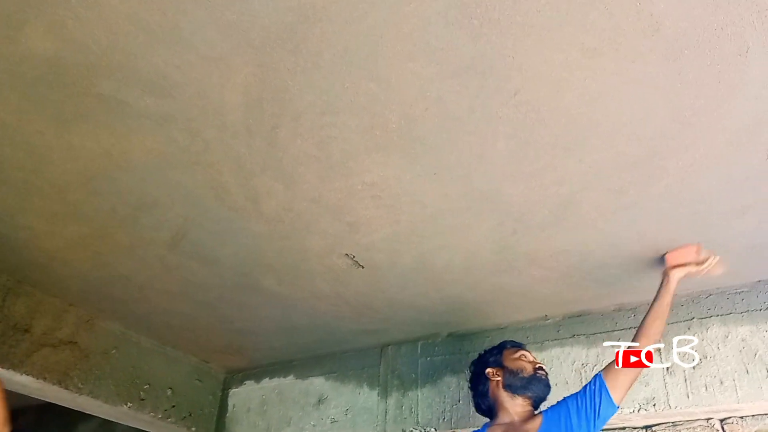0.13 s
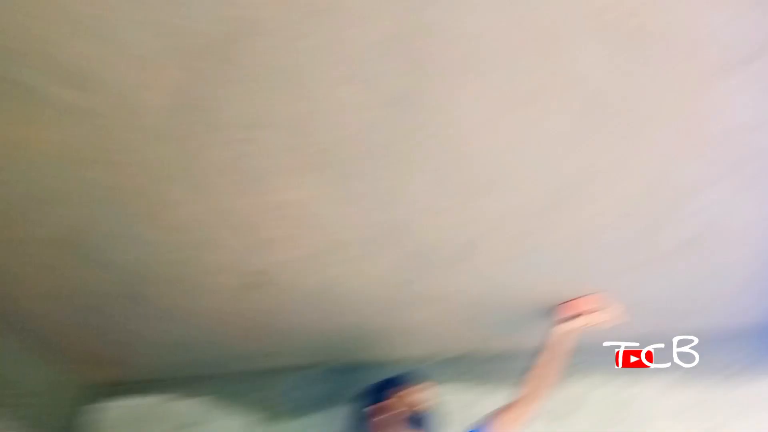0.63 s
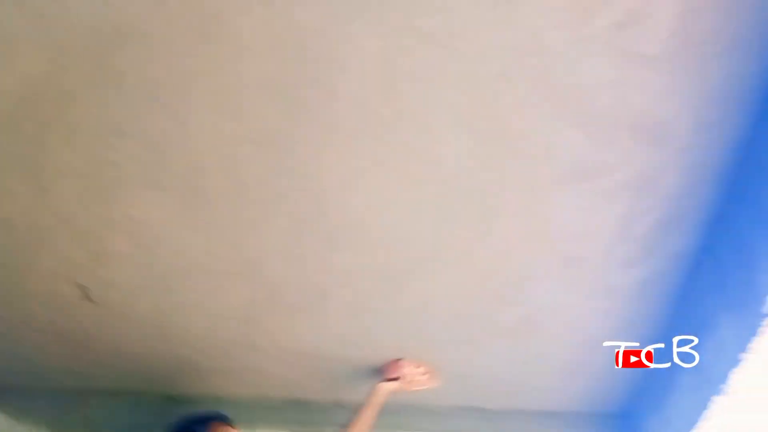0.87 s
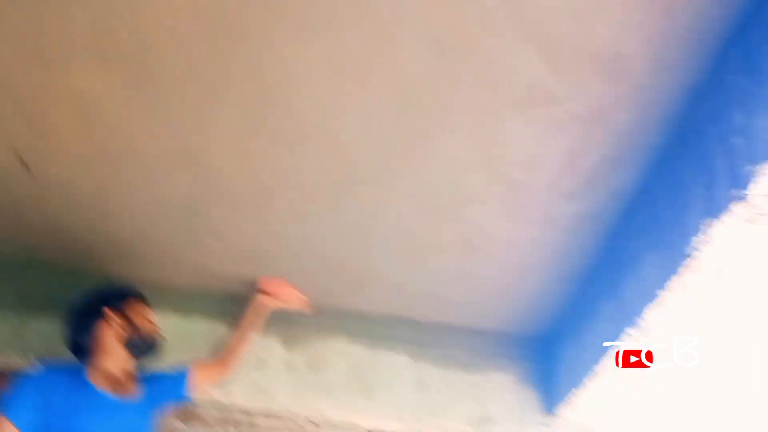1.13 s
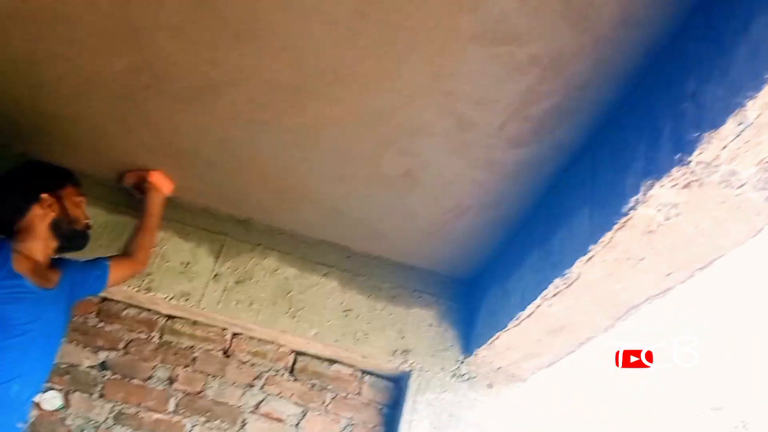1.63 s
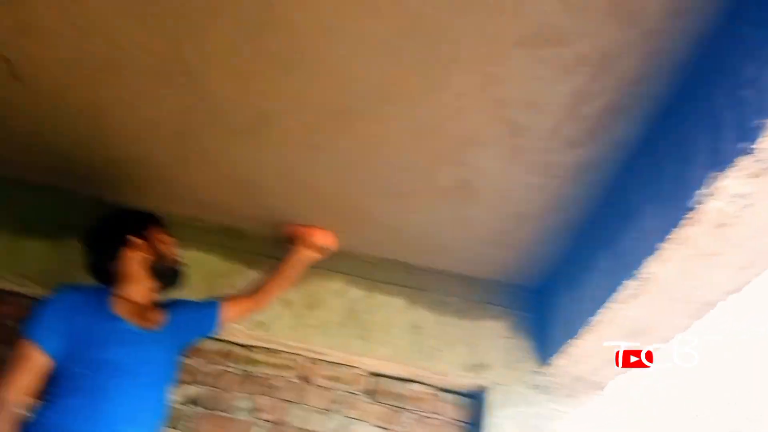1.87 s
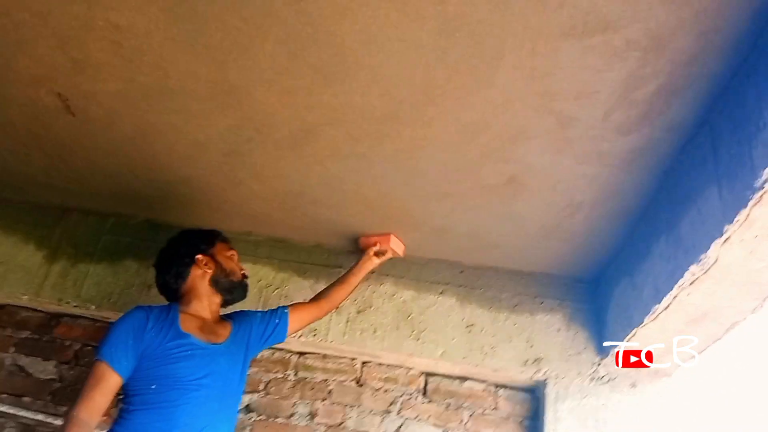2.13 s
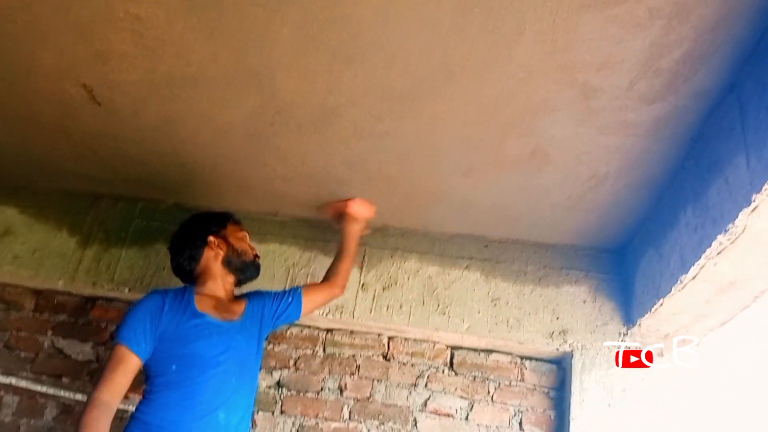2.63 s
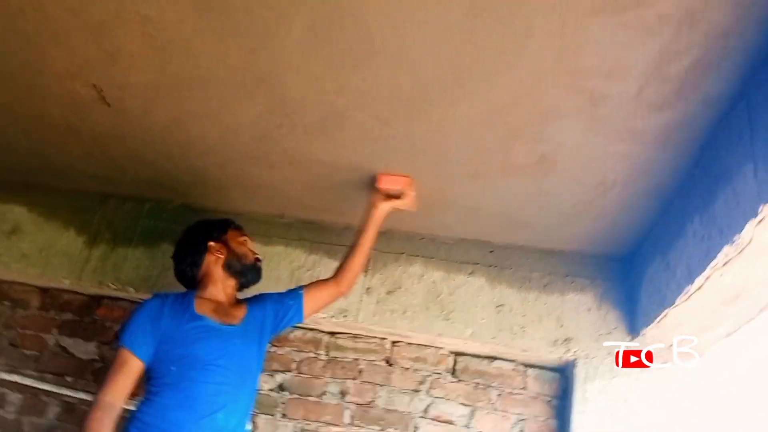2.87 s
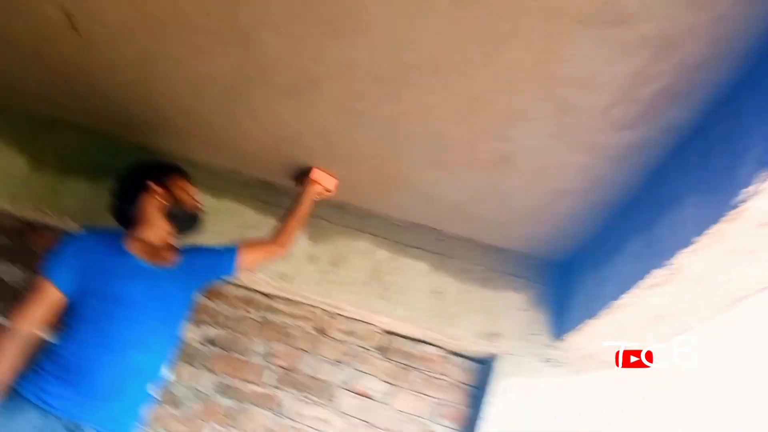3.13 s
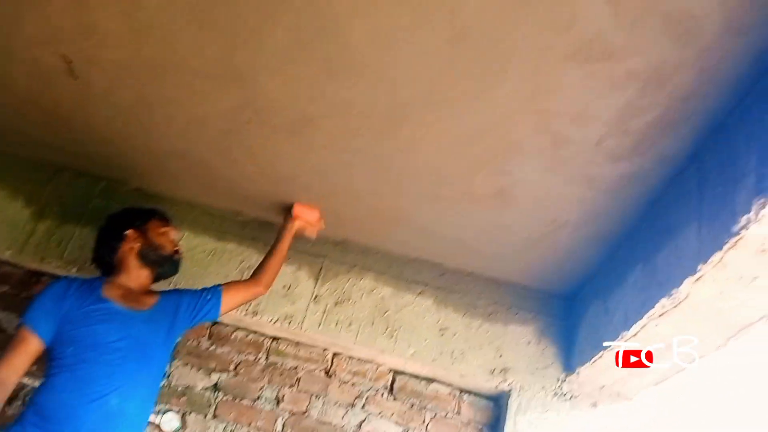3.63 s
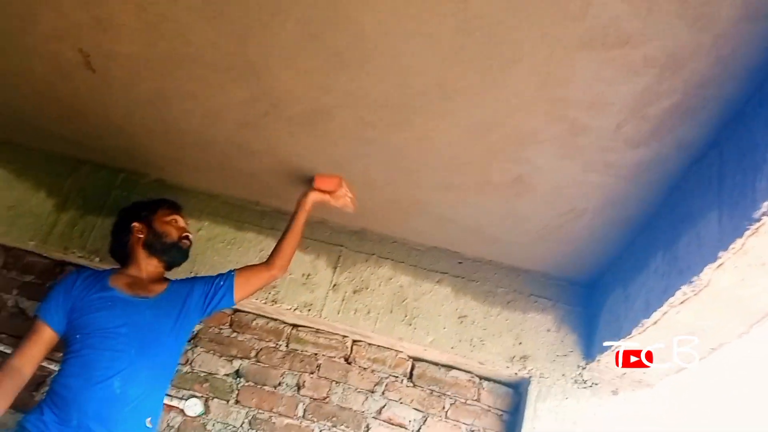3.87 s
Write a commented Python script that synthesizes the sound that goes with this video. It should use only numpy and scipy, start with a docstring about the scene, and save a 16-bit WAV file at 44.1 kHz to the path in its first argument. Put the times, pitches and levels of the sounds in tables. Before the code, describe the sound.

A hand-held block scrapes sandy ceiling plaster in short gritty strokes, with dull knocks at some turns; a board thuds and rattles after a second. Bare echoing room, faint outdoor wash, small mono microphone.

```python
"""A hand-held block is rubbed in strokes over wet plaster on the ceiling of a bare, echoing shell of a room.
From the start crushed sand grains crackle and excite rings of the block, over faint wash and breeze.
Dull knocks, as dying bands of noise, mark some turns; after a second a board underfoot thuds once and
rattles through its modes; late on, soft bumps, short windowed sines, reach the small mono microphone."""
import sys
import numpy as np
from scipy import signal
from scipy.fft import rfft, irfft
from scipy.io import wavfile
from scipy.ndimage import uniform_filter1d

SR = 44100
rng = np.random.default_rng(int(sys.argv[2]) if len(sys.argv) > 2 else 0)


def linear_from_db(decibels):
    """Turn decibels (scalar or array-like) into linear amplitude factors; 0 gives 1."""
    return 10 ** (np.asarray(decibels, float) / 20)


def inscribe(sig):
    """Save sig as 16-bit PCM at rate SR to the path in sys.argv[1].

    A 1-D sig is mono; a 2-D sig holds one channel per row.
    Samples are clipped to [-1, 1] before scaling.
    """
    pcm = np.round(np.clip(np.atleast_2d(sig).T, -1, 1) * 32767)
    wavfile.write(sys.argv[1], SR, pcm.astype(np.int16))


N = 176400

# Spectrum of crushed grit. Each row: frequency in Hz, relative density in dB per Hz.
GRIT_SPECTRUM = [(700, -29), (1250, -2), (2300, 1.5), (3000, 2), (6500, -2.5), (7800, -17), (9400, -16.5),
                 (11300, -30.5), (13800, -29), (14600, -28), (15500, -4.5)]


def evened(x):
    """Scales to rms 1."""
    return x / np.sqrt(np.mean(x ** 2) + 1e-20)


def smoothed(x, size):
    """Two moving averages of size samples, scaled to rms 1: a slow random drift when fed noise."""
    return evened(uniform_filter1d(uniform_filter1d(x, size=size), size=size))


def add(mix, start_s, sound):
    """Mixes a sound in at start_s, cut at the end of the mix."""
    part = mix[round(start_s * SR):][:len(sound)]
    part += sound[:len(part)]


def colour(x, points):
    """Filters by a spectrum of (Hz, dB) points, interpolated over log frequency."""
    f, db = np.transpose(points)
    hz = np.fft.rfftfreq(len(x), 1 / SR)
    gain_db = np.interp(np.log(hz + 1), np.log(f + 1), db)
    return irfft(rfft(x) * linear_from_db(gain_db), len(x))


def resonate(x, hz, width_hz):
    """One-pole resonance that follows hz: shift down to 0 Hz, smooth, shift back up."""
    carrier = np.exp(2j * np.pi * np.cumsum(hz * np.ones(len(x))) / SR)
    pole = np.exp(-np.pi * width_hz / SR)
    return 2 * (carrier * signal.lfilter([1 - pole], [1, -pole], x / carrier)).real


def grains():
    """Sand grains crushed at random moments: impulses of random sign and size, level drifting slightly."""
    grains_per_s, size_spread_db, chatter_db = 9000, 1, 0.5
    hit = rng.random(N) < grains_per_s / SR
    size = np.minimum(rng.exponential(1, N), 5)
    sign = np.sign(rng.standard_normal(N))
    chatter = smoothed(rng.standard_normal(N), 400)
    return hit * sign * linear_from_db(size_spread_db * size + chatter_db * chatter)


def strokes(sand):
    """Grains rubbed between block and plaster: grit and low scrub, heard only while they touch."""
    # One list per stroke. Each row: time in seconds, grit level in dB before the band shares.
    stroke_rows = [
        [(0, -57.5), (.09, -63.5)],
        [(.113, -36), (.232, -38.5), (.25, -52)],
        [(.338, -38), (.39, -43.5), (.47, -41.5)],
        [(.485, -37), (.58, -27), (.65, -32), (.75, -38.5), (.83, -53.5)],
        [(1.34, -55.5), (1.44, -45), (1.5, -40), (1.62, -35.5), (1.81, -35.5), (1.86, -53.5)],
        [(2.158, -28), (2.215, -35), (2.245, -27), (2.31, -40), (2.36, -45.5)],
        [(2.512, -33), (2.585, -28), (2.68, -32), (2.72, -38), (2.87, -44.5)],
        [(2.87, -50), (3.0, -39), (3.05, -37), (3.15, -37.5), (3.26, -51.5)],
        [(3.55, -61.5), (3.61, -51.5), (3.67, -61.5), (3.72, -47)],
        [(3.728, -39.5), (3.77, -46), (3.88, -39.5), (4.0, -47.5)],
    ]
    # Gain per stroke in dB: treble of the grit, grit below mid_hz, low scrub.
    treble_shares = [-28, -2.5, -11, 0, 2, -2.5, -1.5, 4.5, 7, 1]
    mid_shares = [11.5, -1, 5.5, -0.5, -4, -8, -4.5, -1, 2, -4.5]
    scrub_shares = [-3.5, -6, -1, -13.5, -16, -9, -10.5, -14.5, -9, -10]
    # Spectrum of the scrub. Each row: frequency in Hz, relative density in dB per Hz.
    scrub_spectrum = [(80, -81), (170, -14), (520, -2.5), (1100, -6.5), (1600, -23)]
    treble_hz, mid_hz = 7070, 2330
    touch_s, lift_s, scrub_rise_s = 0.0051, 0.069, 0.023
    touch_hiss_db, touch_hiss_s = 9.5, 0.038  # extra treble as the block lands, time constant

    grit = evened(colour(sand, GRIT_SPECTRUM))
    treble = signal.sosfiltfilt(signal.butter(4, treble_hz, "high", fs=SR, output="sos"), grit)
    body = grit - treble
    treble = evened(treble)
    mid = signal.sosfiltfilt(signal.butter(4, mid_hz, fs=SR, output="sos"), body)
    scrub = evened(colour(sand, scrub_spectrum))

    out = np.zeros(N)
    for rows, treble_db, mid_db, scrub_db in zip(stroke_rows, treble_shares, mid_shares, scrub_shares):
        s, level_db = np.transpose(rows)
        end_s = s[-1] + lift_s
        at = slice(round(s[0] * SR), min(round(end_s * SR), N))
        t = np.arange(at.start, at.stop) / SR
        since = t - t[0]
        touch = np.clip(since / touch_s, 0, 1) * np.clip((end_s - t) / lift_s, 0, 1)
        hiss = linear_from_db(treble_db + touch_hiss_db * np.exp(-since / touch_hiss_s)) * treble[at]
        low = linear_from_db(scrub_db) * (1 - np.exp(-since / scrub_rise_s)) * scrub[at]
        rub = body[at] + (linear_from_db(mid_db) - 1) * mid[at] + hiss + low
        out[at] += touch * linear_from_db(np.interp(t, s, level_db)) * rub
    return out


def block_rings(sand):
    """The rubbed block sings in passing bands: grains through two resonances of wandering pitch."""
    # Each row: start in seconds (negative: already sounding), length in seconds, centre in Hz,
    # width in Hz, rms level in dB before the swell.
    rings = [(-.2, 0.23, 1440, 255, -45.5), (0.4, 0.075, 208, 50, -48.5), (0.138, 0.112, 3140, 695, -39),
             (0.331, 0.075, 3000, 600, -41), (0.488, 0.041, 2720, 280, -34),
             (0.52, 0.071, 1260, 441, -37.5), (0.552, 0.15, 1873, 278, -31.5),
             (0.677, 0.11, 1520, 720, -36), (1.422, 0.55, 1510, 298, -47), (1.444, 0.46, 2430, 250, -50),
             (2.165, 0.1, 3880, 496, -42), (2.202, .11, 2910, 600, -34.5), (2.552, 0.17, 3020, 620, -31),
             (2.569, 0.08, 1840, 373, -35.5), (2.551, 0.045, 1130, 120, -44),
             (3.083, 0.2, 1564, 217, -49.5), (3.79, 0.24, 1680, 300, -47), (3.844, 0.16, 5280, 259, -49)]
    wander_hz, chatter_db = 39, 0.5
    wander, flutter = (smoothed(v, 500) for v in rng.standard_normal((2, N)))
    out = np.zeros(N)
    for s, length_s, centre_hz, width_hz, db in rings:
        start_s = max(s, 0)
        at = slice(round(start_s * SR), round((s + length_s) * SR))
        hz = centre_hz + np.minimum(wander_hz, width_hz / 2) * wander[at]
        ring = evened(resonate(resonate(sand[at], hz, width_hz), hz, 3 * width_hz))
        phase = np.linspace(max(-s / length_s, 0), 1, len(ring))
        swell = abs(np.sin(np.pi * phase ** 0.57)) ** 0.66
        add(out, start_s, linear_from_db(db + chatter_db * flutter[at]) * swell * ring)
    return out


def room(x):
    """Bare-room reverberation: decaying noise, early burst plus long tail; three such responses take turns."""
    # Each row: frequency in Hz, t60 of the long tail in seconds.
    tail_decay = [(200, 1), (1500, 1.0), (5000, 0.87), (12000, 0.72)]
    late_db, early_db, early_t60_s = -5.5, -12.5, 0.033
    turns_per_s, delay_samples = 3, 150
    turn = 2 * np.pi * turns_per_s * np.arange(N) / SR
    out = np.zeros(N)
    f, t60_s = np.transpose(tail_decay)
    for k in range(3):
        hz, t, z = signal.stft(rng.standard_normal(SR * 3 // 2), SR, nperseg=256)
        late = linear_from_db(-60 * t / np.interp(np.log(hz + 1), np.log(f), t60_s)[:, None])
        early = linear_from_db(-60 * t / early_t60_s) * np.ones_like(late)
        response = 0
        for shape, db in ((late, late_db), (early, early_db)):
            part = signal.istft(z * shape, SR, nperseg=256)[1][128:]
            response = response + linear_from_db(db) * part / np.linalg.norm(part)
        fed = x * np.sqrt(2 / 3) * np.cos(turn + k * np.pi / 3)
        out += signal.fftconvolve(fed, np.r_[np.zeros(delay_samples), response])[:N]
    return out


def air():
    """Faint steady outdoor wash (coloured noise) and a lumpy breeze (resonant low noise) at the microphone."""
    # Each row: frequency in Hz, relative density in dB per Hz.
    wash_spectrum = [(100, -38), (250, -13.5), (1400, -14), (6500, -19), (12000, -27.5), (15000, -31)]
    wash_db, wind_hz, wind_db, gust_db = -62, 77.3, -69, 7
    wash, wind, gust = rng.standard_normal((3, N))
    gust = smoothed(gust, 3000)
    wind = evened(resonate(resonate(wind, wind_hz, 90), wind_hz, 140))
    return linear_from_db(wash_db) * evened(colour(wash, wash_spectrum)) + linear_from_db(wind_db + gust_db * gust) * wind


def knocks():
    """Dull knocks of the block: decaying noise through two resonances."""
    # Each row: start in seconds, rms level of the first 20 ms in dB before the attack ramp,
    # centre in Hz, width in Hz, t60 of the exciting noise in seconds.
    knock_rows = [(.117, -44.5, 600, 118, 0.33), (0.339, -35.5, 912, 100, 0.13),
                  (1.797, -39, 577, 583, 0.33), (2.881, -45, 662, 158, 0.18),
                  (3.730, -37, 2310, 980, 0.052), (3.731, -37, 710, 900, 0.2),
                  (3.86, -40.5, 350, 260, 0.23)]
    attack_s = 0.0024
    t = np.arange(SR // 3) / SR
    out = np.zeros(N)
    for s, db, hz, width_hz, t60_s in knock_rows:
        blow = rng.standard_normal(len(t)) * linear_from_db(-60 * t / t60_s)
        ring = resonate(resonate(blow, hz, width_hz), hz, 2 * width_hz)
        ring = ring / np.sqrt(np.mean(ring[:SR // 50] ** 2))
        add(out, s, linear_from_db(db) * np.minimum(t / attack_s, 1) * ring)
    return out


def board():
    """A board thuds with a gritty crack, then rattles: noise through its modes, the higher fading faster."""
    # Each row: time in seconds, rattle level in dB.
    blows = [(1.185, -23.5), (1.219, -42), (1.262, -32.5), (1.3, -51), (1.347, -38.5), (1.4, -56),
             (1.48, -42.5), (1.529, -79)]
    # Each row: mode in Hz, width in Hz, relative level in dB.
    modes = [(221, 90, -3.5), (292.6, 150, 2.5), (425, 83, -3), (556, 430, -5), (815, 310, -12)]
    attack_s, crack_db, crack_t60_s = 0.00052, -42, 0.64
    dulling_db_per_s = 10  # per octave above 200 Hz
    s, db = np.transpose(blows)
    t = np.arange(0, s[-1] - s[0], 1 / SR)
    shake, grit = rng.standard_normal((2, SR))[:, :len(t)]
    rattle = np.zeros(len(t))
    for hz, width_hz, mode_db in modes:
        mode = evened(resonate(resonate(shake, hz, width_hz), hz, width_hz))
        rattle += linear_from_db(mode_db - dulling_db_per_s * t * np.log2(hz / 200)) * mode
    rattle = evened(rattle)
    rattle = rattle / np.sqrt(uniform_filter1d(rattle ** 2, size=900))  # the blows set the level
    crack = linear_from_db(crack_db - 60 * t / crack_t60_s) * evened(colour(grit, GRIT_SPECTRUM))
    thud = linear_from_db(np.interp(t + s[0], s, db)) * rattle + crack
    out = np.zeros(N)
    add(out, s[0], np.minimum(t / attack_s, 1) * thud)
    return out


def bumps():
    """Soft low bumps close to the microphone: two sine cycles under a half-sine window."""
    # Each row: time in seconds (half a cycle after onset), sine amplitude in dB before the window,
    # frequency in Hz.
    bump_rows = [(3.315, -43.5, 84), (3.625, -47.5, 116), (3.659, -47, 114), (3.702, -40, 102)]
    cycles = 2
    out = np.zeros(N)
    for s, db, hz in bump_rows:
        u = np.arange(0, 1, hz / cycles / SR)
        add(out, s - 0.5 / hz, linear_from_db(db) * np.sin(np.pi * u) * np.sin(2 * np.pi * cycles * u))
    return out


def scene():
    """Block and board sound in the room, bumps and air at the microphone; mono on both channels."""
    sand = grains()
    dry = strokes(sand) + block_rings(sand) + knocks() + board()
    mono = dry + room(dry) + bumps() + air()
    return np.array([mono, mono])


def roll_off(x):
    """The treble ends steeply here."""
    return signal.sosfilt(signal.butter(12, 16650, fs=SR, output="sos"), x)


def record(dry):
    """Bass cut of the small microphone, then a steep treble limit."""
    bass_cut_hz, edge_hz = 60, 15440
    thin = signal.sosfilt(signal.butter(2, bass_cut_hz, "high", fs=SR, output="sos"), dry)
    edge = signal.firwin(511, edge_hz, window=("kaiser", 9), fs=SR)[None]
    return roll_off(signal.oaconvolve(thin, edge, "same"))


dry = scene()
out = record(dry)
inscribe(out)
```